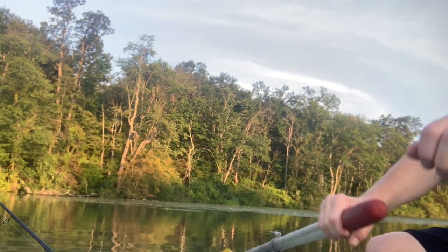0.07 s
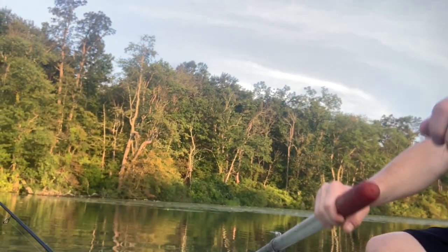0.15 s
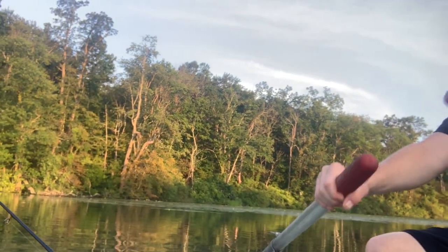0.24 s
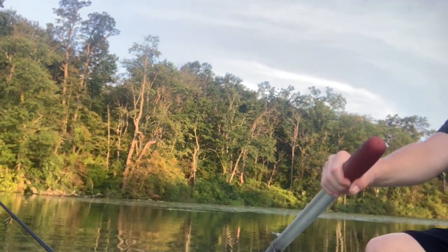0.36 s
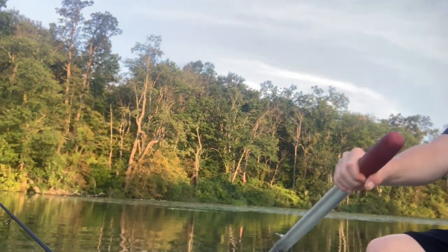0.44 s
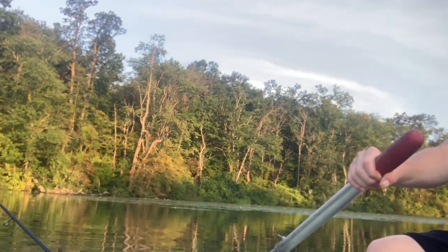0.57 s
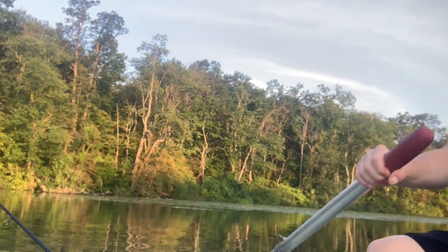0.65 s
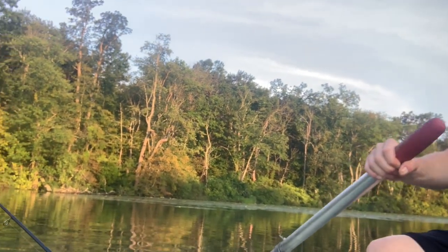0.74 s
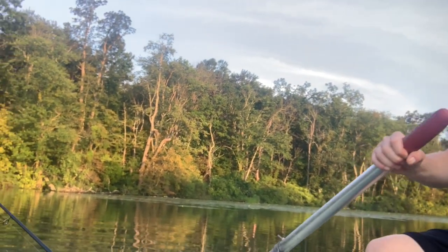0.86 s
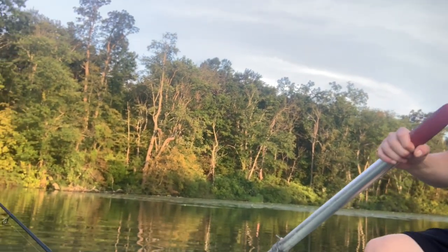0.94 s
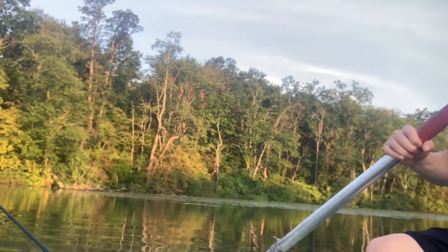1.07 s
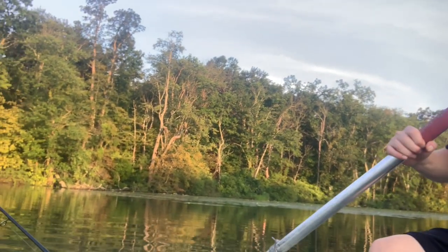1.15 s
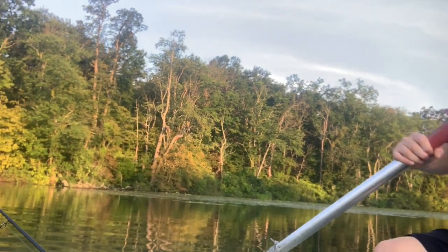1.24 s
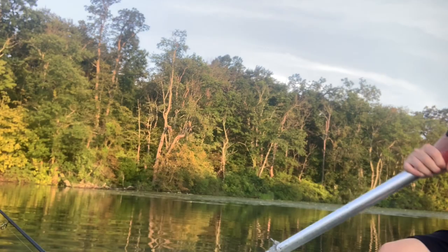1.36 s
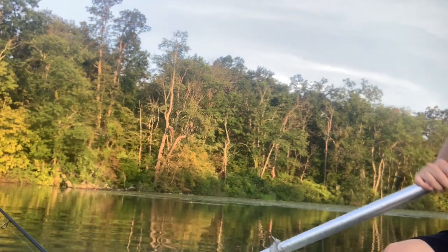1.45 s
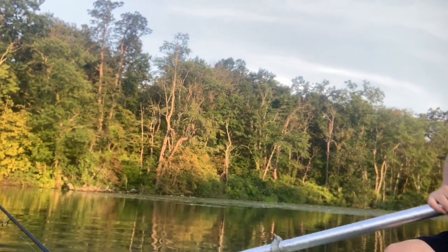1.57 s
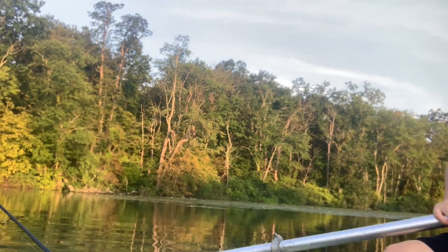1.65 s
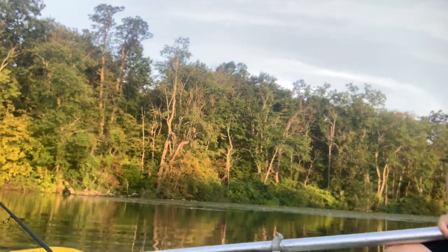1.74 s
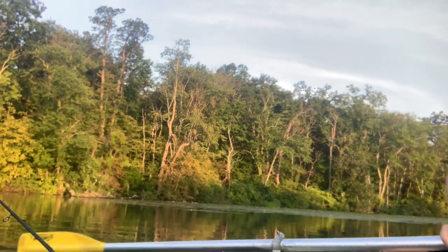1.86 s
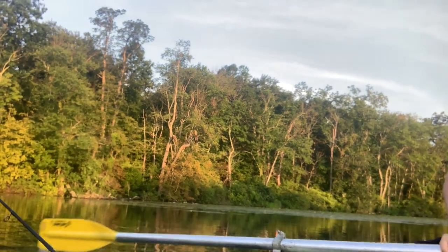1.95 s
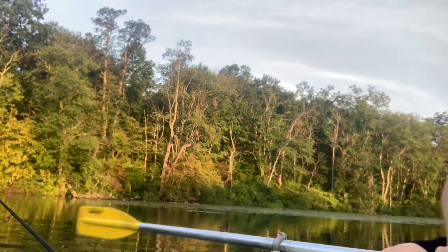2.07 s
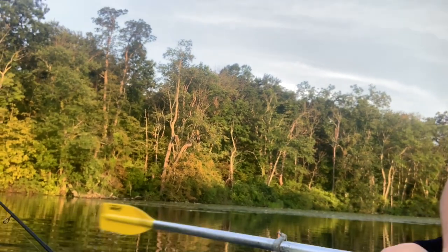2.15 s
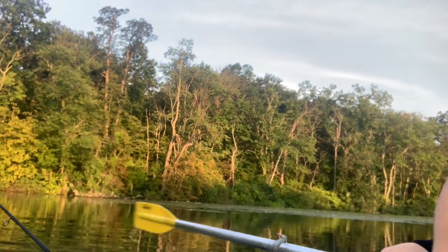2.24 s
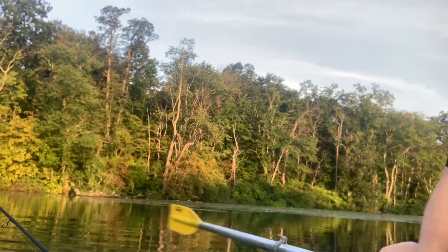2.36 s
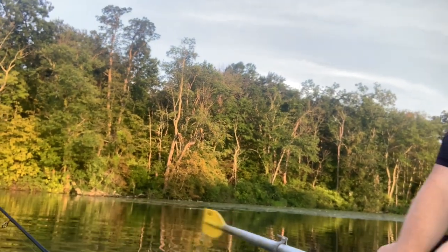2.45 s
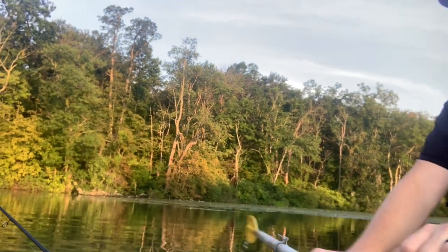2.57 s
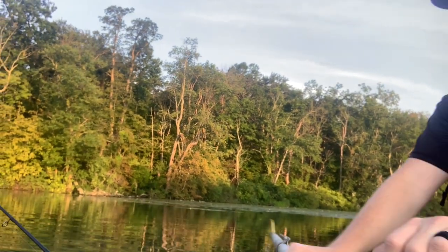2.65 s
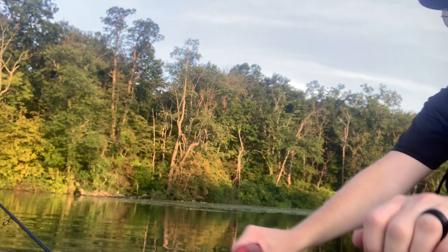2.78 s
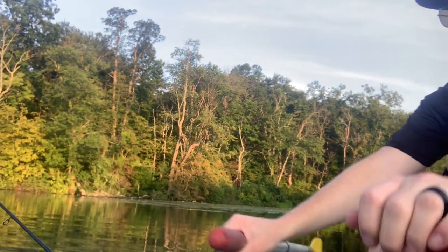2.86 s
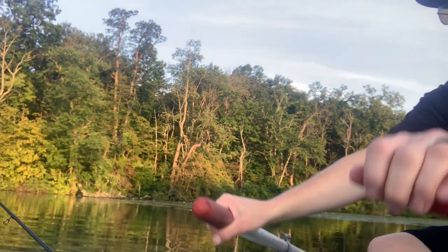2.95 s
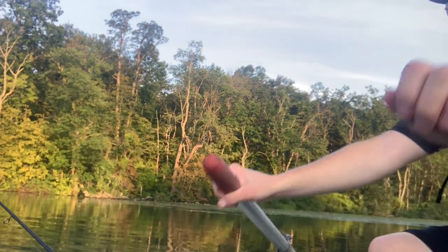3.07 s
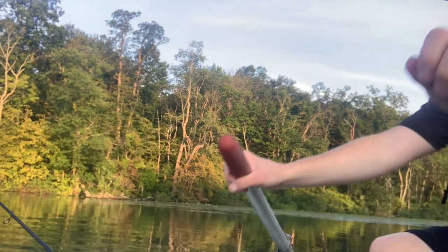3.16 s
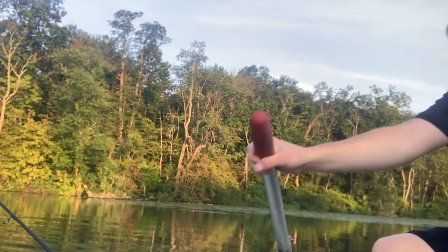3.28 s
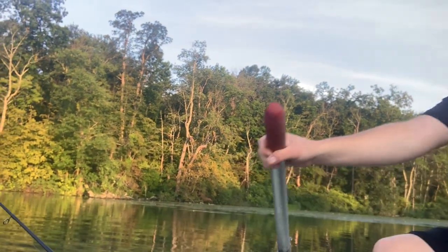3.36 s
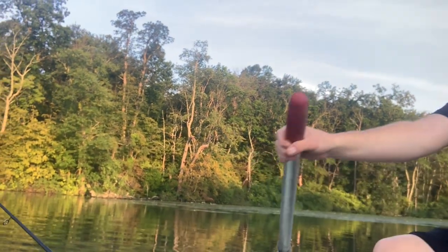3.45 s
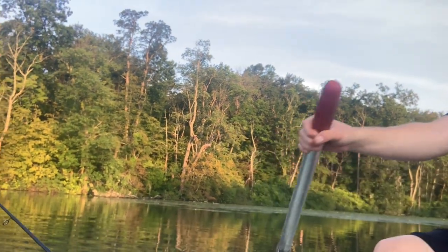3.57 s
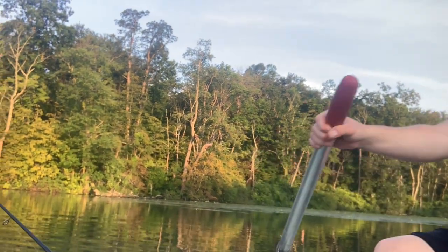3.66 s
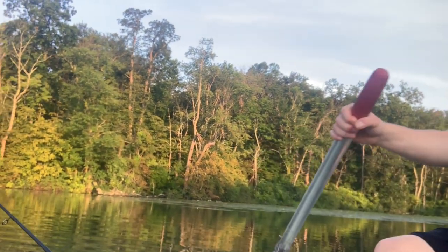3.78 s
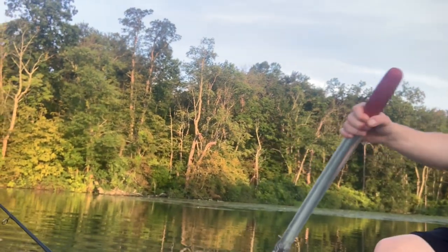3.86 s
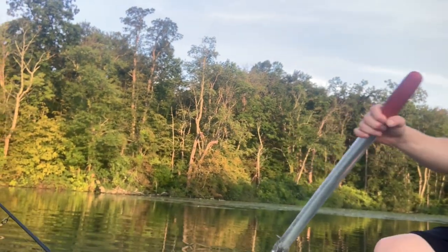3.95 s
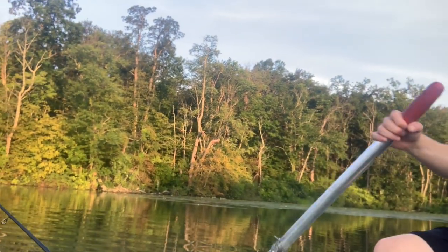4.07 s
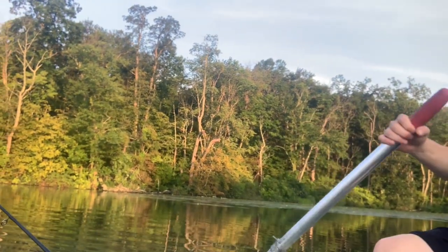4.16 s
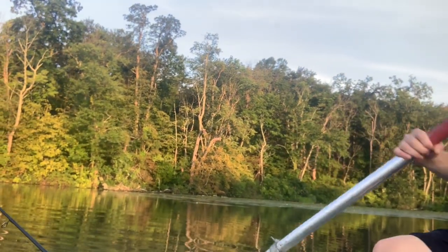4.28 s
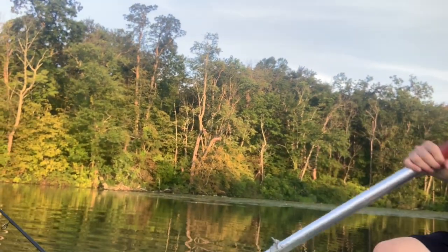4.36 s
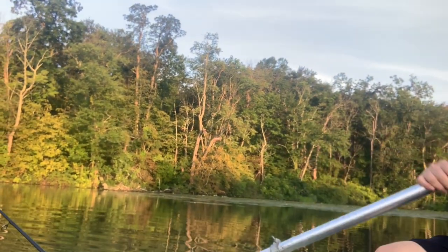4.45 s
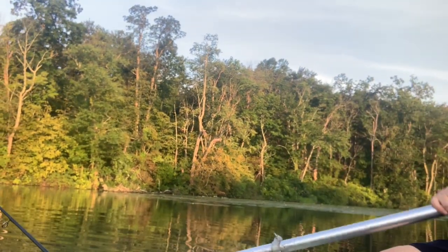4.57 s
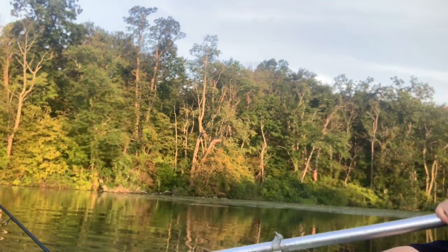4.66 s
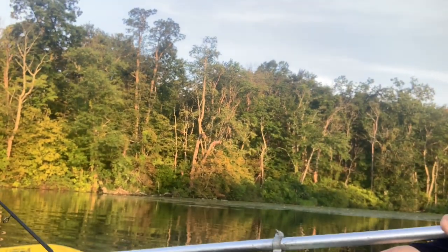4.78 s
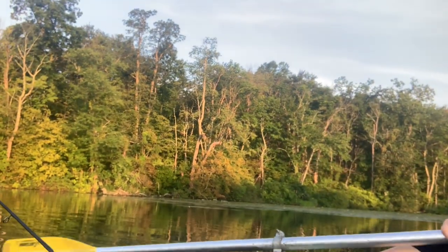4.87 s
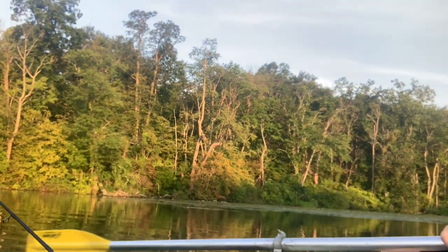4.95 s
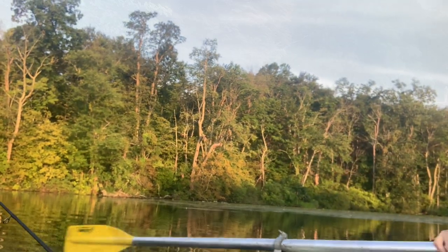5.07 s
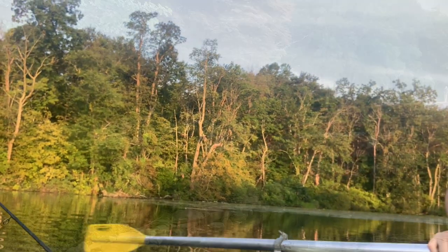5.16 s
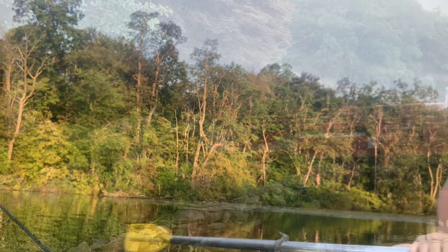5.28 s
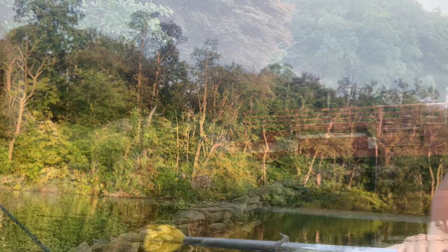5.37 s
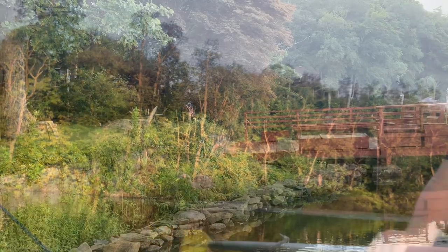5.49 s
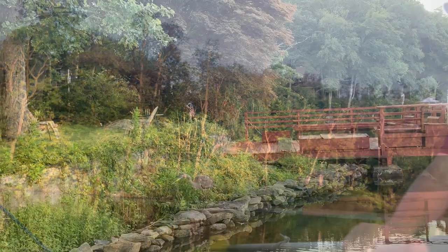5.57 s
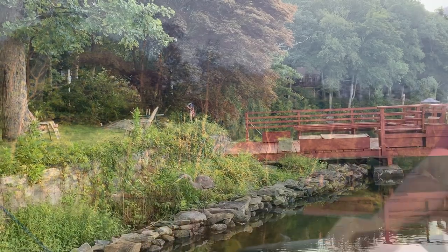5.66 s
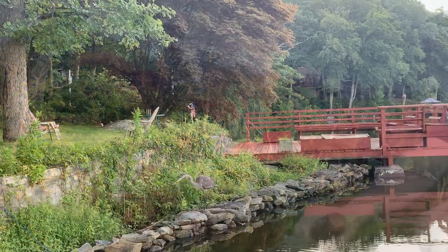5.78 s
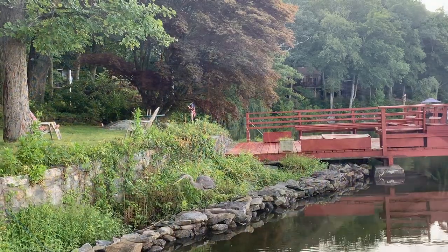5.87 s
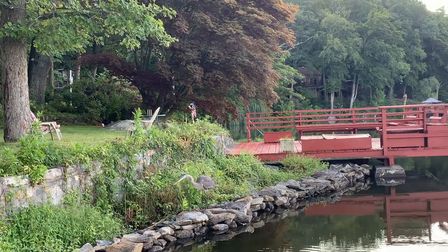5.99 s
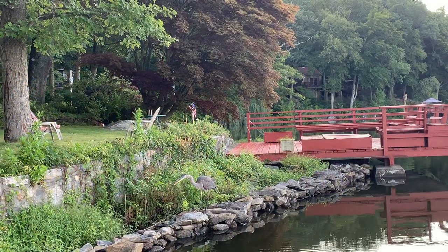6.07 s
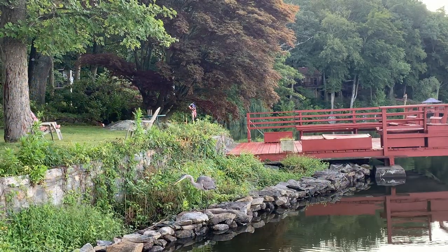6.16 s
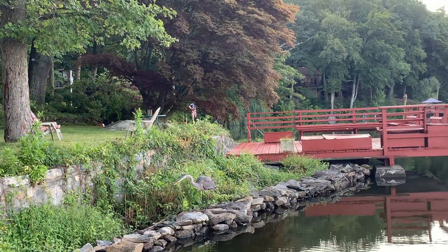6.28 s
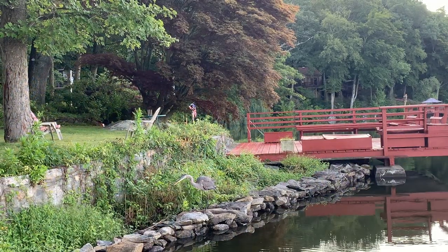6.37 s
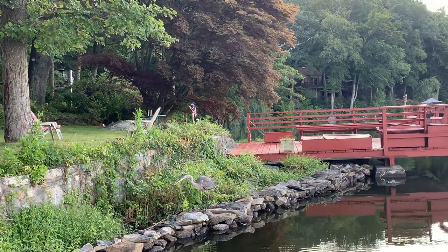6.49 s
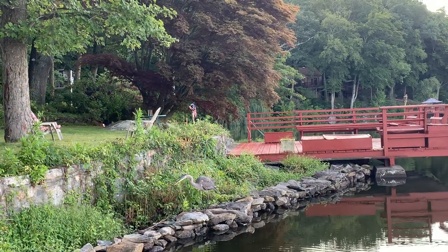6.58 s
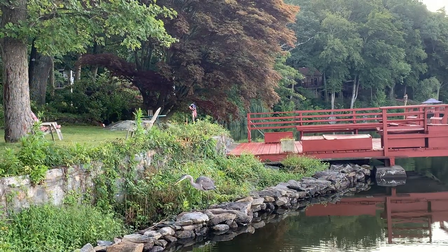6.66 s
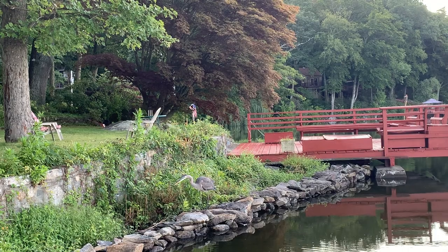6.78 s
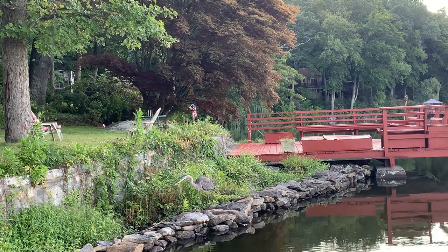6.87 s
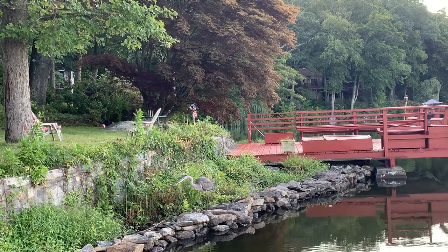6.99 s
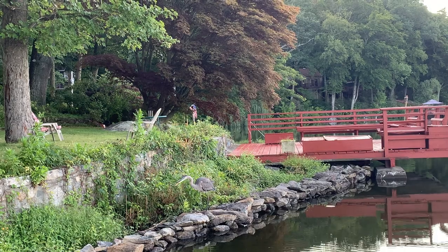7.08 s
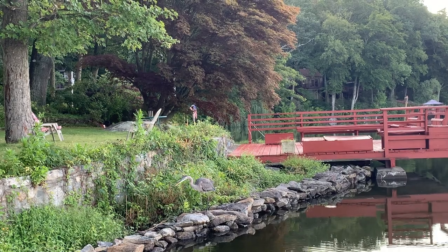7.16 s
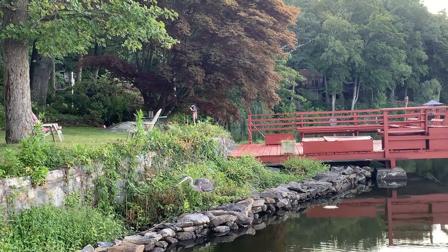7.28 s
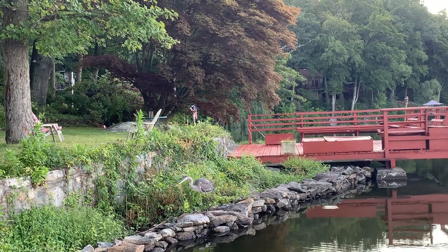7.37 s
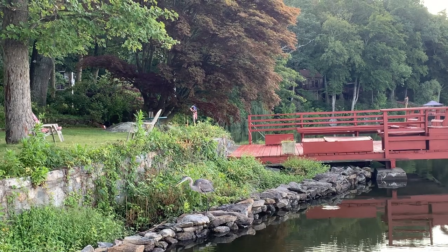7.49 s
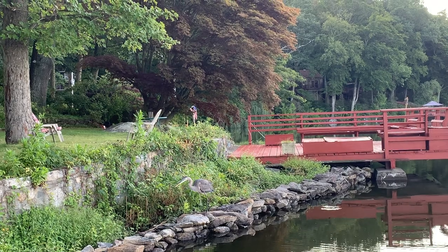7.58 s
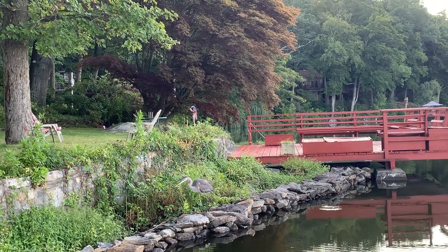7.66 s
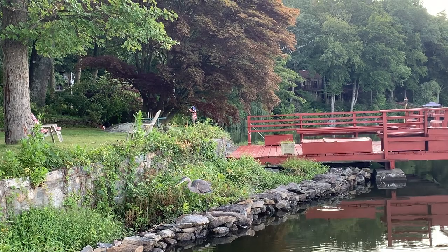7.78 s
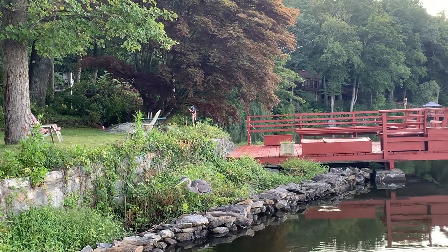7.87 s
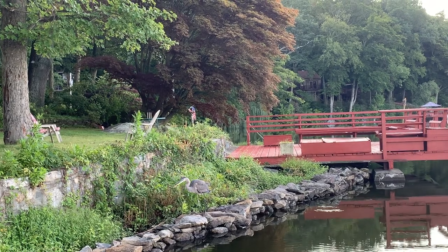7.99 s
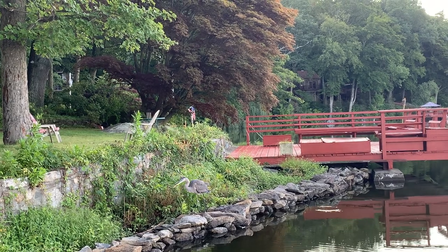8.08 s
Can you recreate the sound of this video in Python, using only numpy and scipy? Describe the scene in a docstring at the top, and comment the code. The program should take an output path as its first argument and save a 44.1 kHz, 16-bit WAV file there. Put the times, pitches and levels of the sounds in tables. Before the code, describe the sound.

Close stereo inside a small metal rowing boat on a lake, with low rumble and faint cicada hiss behind. A tiny clack at 0 s, then a very loud bright steel clank with hull thud at 0.3 s and a duller knock at 0.4. Quiet until 1.2-1.95 s, when the blade leaves the water: gurgling splash, fizz, distinct drips, soft thuds. Light hull bumps and creaks from 2.1 s; knocks around 2.65 and a short high ping at 2.97. From 3.1 s the loaded oar grinds and booms, with a strong low groan at 3.5 and weaker ones near 4; rattles at 4.1 and 4.45. A second splash and drips run 4.5-4.9, last bumps to 5.4. By 5.8 s it has dissolved to a quiet bank: thin birds whistle and chirp until about 7.5, over steady soft hiss, rumble and a far low motor, wavering and weakening to the end.

```python
"""Two oars work in the oarlocks of a small metal boat: struck steel modes and hull panels clank and thud.
Loaded, the oars grind, boom and groan as shaped noise and a sagging tone; the blades splash and drip as
crowds of damped bubble sines. Cicadas hiss in the woods as band noise over rumble and faint high hiss.
The scene then dissolves to a quiet bank: whistled songbirds, steady hiss and a far motor of two harmonics.
A small stereo microphone pair hears sources with differing leads and levels on its two sides."""
import sys
import numpy as np
from scipy import signal
from scipy.fft import rfft, irfft, next_fast_len
from scipy.io import wavfile
from scipy.ndimage import uniform_filter1d, map_coordinates

SR = 44100
rng = np.random.default_rng(int(sys.argv[2]) if len(sys.argv) > 2 else 0)


def store_pcm(level_fs):
    """Save levels as 16-bit WAV."""
    pcm = np.round(np.clip(level_fs, -1, 1) * 32767).astype(np.int16)
    wavfile.write(sys.argv[1], SR, np.atleast_2d(pcm).T)


N = 358532
T = np.arange(N) / SR


def amp(db):
    """Decibel law: level to amplitude."""
    return 10 ** (np.asarray(db) / 20)


def unit(x):
    """Normalisation: scale to rms 1."""
    return x / np.sqrt(np.mean(x ** 2) + 1e-20)


def along(points, hz):
    """Logarithmic frequency scale: interpolate (frequency [Hz], value) points."""
    f, v = np.transpose(points)
    return np.interp(np.log(hz + 1), np.log(f + 1), v)


def curves(rows):
    """Envelopes: interpolate each column over time; last comes a gate open over the rows' span."""
    s, *columns = np.transpose(rows)
    gate = np.clip(np.minimum(T - s[0], s[-1] - T) / .008, 0, 1)
    return [np.interp(T, s, column) for column in columns] + [gate]


def peak(s, db, rise_s, fall_db_s, depth_db=25, hold_s=0):
    """Exponential decay: a level climbs to db within rise_s after s, holds, then falls steadily in dB."""
    climb_db = depth_db * (1 - (T - s) / rise_s)
    fall_db = fall_db_s * np.maximum(T - s - rise_s - hold_s, 0)
    return db - np.maximum(climb_db, fall_db)


def wobble(rate):
    """Random modulation: a smooth curve with rate knots a second."""
    knots = rng.standard_normal(int(N * rate / SR) + 4)
    return map_coordinates(knots, [T * rate])


def filtered(x, response):
    """Linear filtering: the spectrum of x times a complex response of frequency."""
    m = 2 * next_fast_len(N // 2 + 4096)
    return irfft(rfft(x, m) * response(np.fft.rfftfreq(m, 1 / SR)), m)[..., :N]


def noise(spectrum, lo_hz=0, hi_hz=SR):
    """Spectral shaping: coloured noise of rms 1 between two soft edges."""
    def response(f):
        edges = 1 / (1 + (lo_hz / (f + 1)) ** 6) / (1 + (f / hi_hz) ** 6)
        return amp(along(spectrum, f)) * edges
    return unit(filtered(rng.standard_normal(N), response))


def resonance(f, centre_hz, width_hz):
    """Simple resonator: a band-pass response of gain 1 at its centre."""
    damping = 1j * f * width_hz
    return damping / (centre_hz * centre_hz - f * f + damping)


def heard(x, lead_ms, pan_db, turn=0):
    """Interaural cues: the left side leads by lead_ms and turn [rad], and is pan_db stronger."""
    half = lambda f: np.pi * f * lead_ms / 1000 + turn / 2
    sides = filtered(x, lambda f: np.exp(1j * np.array([half(f), -half(f)])))
    return sides * amp([[pan_db / 2], [-pan_db / 2]])


# left-right likeness of far sound: (frequency [Hz], correlation)
LIKENESS = [(60, 0.93), (200, 0.82), (350, 0.14), (550, 0.036), (1300, -0.65), (2400, -0.34), (3500, -0.34),
            (15000, 0.066)]
BASS_TURN, BASS_HZ = -.45, 450  # left lead [rad] in the bass; frequency [Hz] above which it fades


def far(spectrum):
    """Diffuse-field coherence: stereo noise of rms 1, nearly alike on both sides in the bass."""
    def mid_side(f):
        angle = np.arccos(np.clip(along(LIKENESS, f), -1, 1)) / 2
        return amp(along(spectrum, f)) * [np.cos(angle), np.sin(angle)]
    mid, side = filtered(rng.standard_normal((2, N)), mid_side)
    lead = lambda f: np.exp(.5j * np.outer([1, -1], BASS_TURN / (1 + (f / BASS_HZ) ** 4)))
    return filtered(np.array([mid + side, mid - side]), lead) / np.sqrt(np.var(mid) + np.var(side))


def patchy(x, depth_db):
    """Random time-frequency modulation: patches of gain over time and pitch."""
    z = signal.stft(x, nperseg=512)[2]
    field = uniform_filter1d(rng.standard_normal(z.shape[1:]), size=6, axis=0)
    field = uniform_filter1d(field, size=14, axis=1)
    return signal.istft(z * amp(depth_db * unit(field)), nperseg=512)[1][:, :N]


# far rumble on the lake: (frequency [Hz], relative density [dB])
LAKE_SPECTRUM = [(25, -16), (103, -4), (325, -13), (501, -23.5), (1360, -32), (3110, -37), (4500, -43.5),
                 (5850, -63.5), (9900, -120)]


def lake_rumble():
    """Diffuse field: far low noise whose level varies in patches."""
    return amp(-52) * patchy(far(LAKE_SPECTRUM), depth_db=4.5)


# faint high background hiss: (frequency [Hz], relative density [dB])
FINE_HISS_SPECTRUM = [(3000, -43.5), (6000, -2.5), (9000, -4), (12000, -8), (16000, -14.5)]
# its rise and fall: (time [s], level [dB])
FINE_HISS_LEVEL = [(0.0, -84), (0.36, -69.5), (0.9, -79.5), (1.2, -69.5), (1.38, -62.5), (2.7, -67.5),
                   (2.9, -71.5), (3.27, -62.5), (3.7, -73.5), (4.68, -70.5), (5.27, -67.5), (5.7, -72)]


def fine_hiss():
    """Amplitude modulation: a faint high background hiss, rising and falling in level."""
    level_db, _ = curves(FINE_HISS_LEVEL)
    return heard(amp(level_db) * noise(FINE_HISS_SPECTRUM), 0.25, .3, turn=0.98)


# cicada chorus: (frequency [Hz], relative density [dB])
CICADA_SPECTRUM = [(4200, -6), (4900, 1.5), (5700, 8.5), (6500, 4), (7200, -20), (9000, -54)]


def cicadas():
    """Incoherent superposition: the chorus is unrelated band noise on each side, with a shared flutter."""
    sides = np.array([noise(CICADA_SPECTRUM), noise(CICADA_SPECTRUM)])
    return amp(0.69 * wobble(60)) * sides * amp([[-58], [-61]])


# far rumble and faint noise at the bank: (frequency [Hz], relative density [dB])
BANK_SPECTRUM = [(15, -66), (43, -6.5), (113, -2.5), (190, -15), (662, -28), (3290, -39), (4370, -38.5),
                 (7000, -58), (9100, -48), (15400, -120)]


def bank_rumble():
    """Diffuse field: far rumble and faint noise, gently patchy in level."""
    return amp(-47) * patchy(far(BANK_SPECTRUM), depth_db=2.5)


# steady faint high background hiss: (frequency [Hz], relative density [dB])
HISS_AT_BANK = [(4000, -76), (6500, 3.5), (9000, 0.5), (12000, -2.5), (15200, -1.5), (16000, -25.5)]


def bank_hiss():
    """Stationary noise: a steady faint high background hiss above the rumble."""
    return heard(amp(-72.5) * noise(HISS_AT_BANK), -.227, .2, turn=1.03)


# far engine: (time [s], level before swell [dB])
MOTOR_LEVEL = [(5.6, -64.5), (5.93, -43), (6.72, -44), (7.18, -50), (8.13, -50)]
# its harmonics: (multiple of the fundamental, relative level [dB])
MOTOR_ORDERS = [(1, 0), (2, -15)]
MOTOR_HZ = 113


def motor():
    """Harmonic series: a far engine drones; the air makes it swell and fade."""
    db, on = curves(MOTOR_LEVEL)
    swell_db = 4
    turn = 2 * np.pi * MOTOR_HZ * T + .5 * wobble(8.7)
    drone = sum(amp(level + swell_db * wobble(9.0)) * np.sin(k * turn) for k, level in MOTOR_ORDERS)
    return heard(on * amp(db) * drone, 0, .2, turn=BASS_TURN)


# near bird's first note: (time [s], pitch [Hz], level [dB])
NEAR_BIRD = [(5.596, 3190, -51), (5.631, 3334, -59.5), (5.774, 3180, -59.5), (5.81, 3250, -81)]
# far bird notes: (start [s], length [s], start pitch [Hz], end pitch [Hz], start level [dB])
FAR_BIRDS = [(5.851, .04, 3400, 2710, -71.5), (6.77, .05, 3000, 2530, -65.5),
             (5.994, 0.1, 2740, 2860, -67.5), (6.109, 0.18, 3260, 3100, -66),
             (6.284, 0.055, 3430, 2750, -61), (6.386, 0.053, 3880, 3580, -64.5),
             (6.39, 0.068, 4420, 4040, -64.5), (6.479, 0.23, 3590, 3450, -71),
             (6.55, 0.042, 4540, 4800, -60), (6.595, 0.048, 4800, 4300, -66.5),
             (6.668, 0.077, 4040, 3340, -58.5), (6.709, 0.059, 3460, 3240, -57),
             (6.86, 0.054, 3650, 3650, -59), (6.909, 0.065, 3590, 3920, -65.5),
             (7.01, 0.056, 3540, 3120, -58), (7.062, 0.058, 3780, 2720, -59),
             (7.196, 0.14, 3000, 3030, -67), (7.443, 0.05, 4770, 3890, -62)]
NOTE_FADE_DB = 1.5  # from start to end of a far note


def birds():
    """Frequency modulation and reverberation: unsteady far whistles and a near note, smeared by the trees."""
    waver = 1 + 0.014 * wobble(90)
    flutter = .8 + 0.7 * wobble(260)  # leaves break up the far notes
    hz, db, on = curves(NEAR_BIRD)
    turn = 2 * np.pi * np.cumsum(hz) / SR
    # the near note shows the partials around its strongest
    partials = .2 * np.sin(3 / 2 * turn) + .1 * np.sin(3 / 4 * turn) + .07 * np.sin(5 / 4 * turn)
    out = on * amp(db) * (np.sin(turn) + partials)
    for s, long, start_hz, end_hz, start_db in FAR_BIRDS:
        hz, db, on = curves([(s, start_hz, start_db), (s + long, end_hz, start_db - NOTE_FADE_DB)])
        out += on * amp(db) * flutter * np.sin(2 * np.pi * np.cumsum(hz * waver) / SR)
    t = T[:SR // 2]
    tail = rng.standard_normal((2, len(t))) * amp(-60 * t / 0.5)
    smeared = signal.fftconvolve(out[None], tail / np.linalg.norm(tail[0]), axes=1)[:, :N]
    return heard(out, -0.31, 0.58) + amp(-1.0) * smeared


def bubbles(s, db, hz, cycles, rise=.11):
    """Bubble resonance: damped sines whose pitch rises as each bubble nears the surface."""
    t = np.arange(700) / SR
    u = t * (hz / cycles)[:, None]
    envelope = amp(db)[:, None] * np.exp(-2.5 * u) * (1 - np.exp(-12 * u))
    x = envelope * np.sin(2 * np.pi * hz[:, None] * t * (1 + rise * u))
    x *= np.cos(np.linspace(0, np.pi / 2, len(t)))  # close each bubble smoothly
    at = np.round(s * SR).astype(int)[:, None] + np.arange(len(t))
    return np.bincount(at.ravel(), x.ravel(), N + SR)[:N]


# bubble strength by pitch, also the colour of fizz and spray: (frequency [Hz], relative level [dB])
BUBBLE_SPECTRUM = [(300, 19), (700, -6), (1500, -6), (3000, -3), (5000, 7), (8500, -8), (9500, -130),
                   (16000, -37.5)]


def crowd(lo_hz, hi_hz, count, cycles=5, longer=18):
    """Random superposition: bubbles of chance pitch, size and life while the oars work; rms 1."""
    draw = rng.random((count, 4))
    hz = lo_hz * (hi_hz / lo_hz) ** draw[:, 1]
    db = along(BUBBLE_SPECTRUM, hz) - 3 * np.log(draw[:, 2] + .01)
    return unit(bubbles(5.2 * draw[:, 0], db, hz, cycles + longer * draw[:, 3] ** 2))


# single bubbles and drops: (time [s], level [dB], pitch [Hz])
SINGLE_DROPS = [(0.136, -57, 2710), (0.202, -56, 1730), (1.335, -42.5, 2870), (1.401, -29, 3680),
                (1.4258, -33.5, 2050), (1.493, -36, 4560), (1.5586, -43, 1540), (1.581, -42, 1690),
                (1.609, -39, 2400), (1.681, -38, 2300), (1.762, -45, 980), (1.772, -36.5, 1960),
                (1.779, -36, 1310), (1.861, -41.5, 940), (1.924, -43, 1290), (4.535, -37, 3320),
                (4.617, -28, 3900), (4.633, -29, 4000), (4.583, -44, 1890), (4.627, -38, 1750),
                (4.6516, -34, 2070), (4.743, -41, 1020), (4.759, -34, 830), (4.7714, -30.5, 1083),
                (4.795, -34.5, 1000), (4.865, -42, 1470), (4.892, -36, 3660)]
# a short steady ping and its partials: (time [s], level [dB], pitch [Hz])
PING_PARTIALS = [(2.969, -33.5, 2270), (2.969, -43, 4240), (2.969, -46, 4400), (2.969, -41, 10000)]


def drops():
    """Bubble resonance: loud single bubbles, each with two weaker neighbours near in time and pitch; one ping."""
    s, db, hz = np.transpose(SINGLE_DROPS)
    out = bubbles(s, db, hz, np.clip(36000 / hz, 7, 18))
    out += bubbles(*np.transpose(PING_PARTIALS), np.full(len(PING_PARTIALS), 30.), rise=0)
    for _ in range(2):
        late, off = rng.standard_normal((2, len(s)))
        out += bubbles(s + .008 * late, db - 8, hz * np.exp(.13 * off), np.full(len(s), 9.))
    return heard(out, 0.113, 5.9)


# water eddies round the blade: (time [s], level before wobble [dB])
EDDIES = [(.2, -80), (.27, -54.5), (.32, -89.5), (3.18, -85), (3.28, -56.5), (3.5, -57), (3.75, -57),
          (3.84, -81), (3.87, -57.5), (4.1, -54), (4.2, -72)]
# blade leaves the water: (start [s], end [s], flow level [dB])
BLADE_EXITS = [(1.172, 1.954, -58.5), (4.474, 4.915, -57.5)]
SPLASH_RISE_S, SPLASH_FALL_S, SPLASH_SWELL_DB = 0.38, 0.26, 12.5
WATER_DB, SPRAY_DB = -0.5, -4.5  # against the flow level


def splash():
    """Bubble entrainment: water pours off the blade in clumps as gurgles, small bubbles, fizz and ticking spray."""
    clumps = amp(3.6 * wobble(60))
    gurgle = amp(3.5 * wobble(30) + 3) * crowd(650, 2620, count=2400)
    fizz = .35 * noise(BUBBLE_SPECTRUM, lo_hz=1500)
    water = clumps * (crowd(1520, 9460, count=2600) + fizz)
    ticks = crowd(4000, 8800, count=400, cycles=2.6, longer=0)
    spray = noise(BUBBLE_SPECTRUM, lo_hz=6810) + ticks
    swirl_db, pulling = curves(EDDIES)
    out = pulling * amp(swirl_db + 3 * wobble(17)) * crowd(600, 1800, count=2600)
    for start, end, db in BLADE_EXITS:
        low_db = db - SPLASH_SWELL_DB
        flow_db, on = curves([(start, low_db), (start + SPLASH_RISE_S, db),
                              (end - SPLASH_FALL_S, db), (end, low_db)])
        out += on * amp(flow_db) * (gurgle + amp(WATER_DB) * water + amp(SPRAY_DB) * spray)
    return out


# the oar shaft's resonances: (centre [Hz], width [Hz], level over what excites it [dB])
SHAFT_MODES = [(920, 13, 0), (1343, 180, -1.5), (2360, 600, -0.5)]


def sings(f):
    """Forced resonance: the shaft's modes on top of what excites them."""
    return 1 + sum(amp(db) * resonance(f, centre, width) for centre, width, db in SHAFT_MODES)


# hull panels: (frequency [Hz], 60 dB decay time [s])
HULL_MODES = [(70, 0.97), (105, 0.15), (170, 0.17), (185, 0.34), (220, 0.15), (250, 0.018), (290, 0.17),
              (335, 0.17), (425, 0.095), (500, 0.13), (545, 0.2), (615, 0.064), (720, .07)]
HUM_DB = 5  # how far each panel stands out of the grinding


def hums(f):
    """Forced resonance: the hull panels' modes, of width set by their decay time, on top of what excites them."""
    width = lambda t60: np.log(1000) / np.pi / t60
    return 1 + amp(HUM_DB) * sum(resonance(f, centre, width(t60)) for centre, t60 in HULL_MODES)


# hull under load: (frequency [Hz], relative density [dB])
LOADED_HULL = [(25, -42.5), (65, -4.5), (121, 0.5), (220, -3), (600, -14), (830, -30), (1650, -41.5),
               (4380, -49), (6500, -78.5), (11000, -120)]
# steady oar load on the hull: (time [s], level [dB])
OAR_LOAD = [(0.0, -56), (1.06, -62), (1.4, -42), (1.68, -39), (1.8, -56), (2.05, -57), (2.24, -43.5),
            (2.32, -53.5), (2.62, -60.5), (3.2, -48), (3.46, -39), (3.8, -38.5), (4.11, -36), (4.33, -46),
            (4.5, -38.5), (4.68, -36.5), (4.8, -45.5), (5.08, -42), (5.15, -52), (5.7, -101)]
PIVOT_DB, BODY_OVER_DB, RUB_OVER_DB = -39.5, -2, -25.5  # at this load, body and rub against the boom
BODY_GROWS, RUB_GROWS = 1.4, 1.3  # dB per dB of load
PULL_START_S, PULL_END_S, PULL_RUB_DB = 2.3, 5.5, 6.5  # blade pulls in the water, shaft grinds harder
# the oar lurches in its lock and the hull shudders: (onset [s], boom level [dB], body level [dB])
LURCHES = [(0.331, -44.5, -27.5), (.44, -22.5, -28), (1.855, -40, -46), (2.65, -36.5, -36.5),
           (2.895, -42.5, -44.5), (3.1, -37.5, -37), (3.27, -56.5, -34), (3.512, -31, -33),
           (4.879, -36, -42.5), (5.22, -33, -50), (5.388, -39.5, -37)]
JOLT_RISE_S, JOLT_HOLD_S = 0.012, 0.025
BOOM_FALL_DB_S, BODY_FALL_DB_S = 85, 124.5
# oarlock pin slipping: (full strength [s], level [dB], fall [dB/s])
PIN_SLIPS = [(3.53, -11.5, 255), (3.941, -26.5, 158), (4.074, -29, 164)]
GROAN_HZ, GROAN_SAG_HZ_S = 220.7, 13
GROAN_RISE_S, GROAN_HOLD_S, GROAN_LASTS_S = 0.085, 0.018, 0.23


def strain():
    """Stick-slip friction: the loaded oar grinds in its lock; the panels boom, the pin slips at a hull mode."""
    load_db, gate = curves(OAR_LOAD)
    over_db = load_db - PIVOT_DB
    jolt = lambda s, db, fall: amp(peak(s, db, JOLT_RISE_S, fall, hold_s=JOLT_HOLD_S))
    boom = amp(load_db) + sum(jolt(s, db, BOOM_FALL_DB_S) for s, db, _ in LURCHES)
    shudder = sum(jolt(s, db, BODY_FALL_DB_S) for s, _, db in LURCHES)
    body = amp(PIVOT_DB + BODY_OVER_DB + BODY_GROWS * over_db) + shudder
    pull = np.clip(np.minimum(T - PULL_START_S, PULL_END_S - T) / 0.038, 0, 1)
    rub = amp(PIVOT_DB + RUB_OVER_DB + RUB_GROWS * over_db + PULL_RUB_DB * pull) + amp(-26.5) * shudder
    jerk = wobble(35)  # body and rub jerk together
    panel_noise = unit(filtered(noise(LOADED_HULL, lo_hz=160, hi_hz=720), hums))
    shaft_noise = filtered(noise(LOADED_HULL, lo_hz=680), sings)
    out = boom * amp(1.5 * wobble(13.0)) * noise(LOADED_HULL, hi_hz=142)
    out += body * amp(3.17 * jerk) * panel_noise
    out += rub * amp(3.1 * jerk + 1.7 * wobble(7.0)) * shaft_noise
    for s, db, fall_db_s in PIN_SLIPS:
        turn = 2 * np.pi * np.cumsum(GROAN_HZ - GROAN_SAG_HZ_S * np.clip(T - s, -1, 1)) / SR
        on = np.clip((s + GROAN_LASTS_S - T) / .02, 0, 1)
        groan_db = peak(s - GROAN_RISE_S, db, GROAN_RISE_S, fall_db_s, depth_db=42, hold_s=GROAN_HOLD_S)
        out += on * amp(groan_db) * np.sin(turn)
    return gate * out


def ring(hz, db, t60, t):
    """Modal superposition: decaying modes at chance strengths and phases, peak 1."""
    chance = rng.standard_normal((2, len(hz), 1))
    spread_db = 3.2
    modes = amp(db + spread_db * chance[0] - 60 * t / t60) * np.sin(2 * np.pi * hz * t + chance[1])
    x = np.sum(modes, axis=0)
    return x / np.max(np.abs(x))


# oarlock and oar shaft: (frequency [Hz], relative level [dB], 60 dB decay time [s])
STEEL_MODES = [(1198, -3.5, 0.057), (1450, 0, 0.12), (1800, 4, .1), (2260, 4, 0.06), (2950, 9, 0.092),
               (3300, 3.5, .08), (4160, 8.5, .07), (4380, 5, .055)]
# oar against oarlock: (time [s], blow level [dB], hull thud level [dB], thud centre [Hz], treble level [dB])
CONTACTS = [(0.0275, -31.5, -34.5, 318, -63), (0.3209, -1, -12, 314, -15), (0.343, -32, -21, 480, -60),
            (0.4068, -15, -15, 300, -54), (0.4333, -15, -7, 470, -38.5), (0.7364, -47.5, -22.5, 230, -79),
            (1.4007, -43, -26, 178, -47.5), (1.6364, -48, -21.5, 224, -50.5), (1.8538, -50, -23, 212, -64),
            (1.924, -68, -32, 103, -43), (2.108, -53.5, -34, 105, -54), (2.181, -53, -31, 127, -55),
            (2.428, -58.5, -40, 177, -66.5), (2.6475, -32, -22.5, 550, -75),
            (2.665, -60, -17, 172, -77),(2.8981, -72, -26, 127, -69), (3.098, -40.5, -17.5, 293, -52),
            (3.129, -29.5, -64, 200, -37.5), (3.2397, -67, -27.5, 540, -75), (3.2681, -65, -15, 215, -79),
            (3.515, -62, -15.5, 212, -62), (3.859, -71, -31.5, 400, -66), (3.8849, -60, -22, 125, -57.5),
            (4.0659, -35.5, -20.5, 221, -41.5), (4.125, -30, -24.5, 500, -28), (4.144, -34, -45, 400, -57),
            (4.234, -36, -38, 105, -41), (4.379, -45, -51, 167, -46), (4.456, -26.5, -21, 394, -23),
            (5.0019, -55, -29, 179, -66.5), (5.3379, -53, -24.5, 206, -67), (5.3878, -34, -19, 450, -42.5)]
KNOCK_FROM_BLOW, KNOCK_FROM_THUD, KNOCK_DB = 0.53, 0.36, -17.5  # the mid knock grows with both, dB per dB
EDGE_FOLLOWS = .45  # the upper rattle takes on this share of a blow's dullness
HARD_TILT_DB, SOFT_DULLS = 6, 0.6  # steel treble per octave at 0 dB; lost per octave and dB of softer blow


def clanks():
    """Impact excitation: contacts rattle the steel, whose treble dies first, and thud the hull at the same moment."""
    t = np.arange(SR // 3) / SR
    flat = [(500, 0.5), (6000, 3.5), (16000, -16.0)]  # (frequency [Hz], relative density [dB])
    ragged = amp(1.4 * wobble(90))  # the loose pin chatters
    body = unit(filtered(noise(flat, 390, 1900), sings))
    edge = unit(filtered(noise(flat, 1600, 3100), sings))
    upper, top = noise(flat, 2100, 4400), noise(flat, lo_hz=4520)
    fall = lambda fast, slow, slow_db: amp(-60 * t / fast) + amp(slow_db - 60 * t / slow)
    body_fall, edge_fall, top_fall = fall(0.065, 0.25, -2.0), fall(0.058, 0.15, -10.5), fall(0.034, 0.13, -15)
    steel_hz, steel_db, steel_t60 = np.transpose(STEEL_MODES)[:, :, None]
    panel_hz, panel_t60 = np.transpose(HULL_MODES)[:, :, None]
    out = np.zeros(N)
    for s, db, thud_db, centre_hz, top_db in CONTACTS:
        knock_db = KNOCK_FROM_BLOW * db + KNOCK_FROM_THUD * thud_db + KNOCK_DB
        upper_db = db + EDGE_FOLLOWS * (top_db - db)
        at = slice(round(s * SR), round(s * SR) + len(t))
        rattle = amp(knock_db) * body[at] * body_fall
        rattle += (amp(db - 9.0) * edge[at] + amp(upper_db - 6.5) * upper[at]) * edge_fall
        rattle += amp(top_db) * top[at] * top_fall
        tilt_db = (HARD_TILT_DB + SOFT_DULLS * upper_db) * np.log2(steel_hz / steel_hz[0])
        steel = amp(db - 3.0) * ring(steel_hz, steel_db + tilt_db, steel_t60, t)
        near_db = -13 * np.abs(np.log2(panel_hz / centre_hz))  # panels near the blow's centre speak most
        thud = amp(thud_db) * ring(panel_hz, near_db, panel_t60, t) * (1 - np.exp(-t / 0.0023))
        out[at] += (ragged[at] * rattle + steel) * (1 - np.exp(-t / 0.003)) + thud
    return out


# sound in the boat: (frequency [Hz], left lead [rad])
BOAT_LEAD = [(60, -.45), (350, -.45), (700, .6), (1400, 1.4), (2400, 2.8), (3100, 4.7), (5000, 9.4),
             (9200, 15.7), (16000, 25.9)]
# share off the hull walls: (frequency [Hz], mixing angle [rad])
WALL_SHARE = [(150, .08), (260, .15), (500, .45), (1000, .5), (5000, .7), (8000, .25), (12000, .1)]
BASS_LEFT_DB, BASS_LEFT_HZ = 2.5, 130  # the hull's lowest notes reach the left side stronger


def aboard(source, pan_db):
    """Direct and scattered sound: a path leading on the left; hull walls add an unrelated part to each side."""
    def paths(f):
        lead = np.interp(f, *np.transpose(BOAT_LEAD))
        left_db = BASS_LEFT_DB / 2 / (1 + (f / BASS_LEFT_HZ) ** 4)
        return np.exp(.5j * np.array([lead, -lead])) * amp([left_db, -left_db])
    mix = lambda f: np.clip(along(WALL_SHARE, f), 0, np.pi / 4)
    unrelated = np.array([source(), source()])
    direct, walls = filtered(unrelated, lambda f: [np.cos(mix(f)), np.sin(mix(f))])
    sides = np.array([direct + walls, direct - walls])
    return filtered(sides, paths) * amp([[pan_db / 2], [-pan_db / 2]])


def scene():
    """Superposition and equal-power fading: the lake gives way to the bank around the boat, birds and motor."""
    cross = lambda start, end: np.clip((T - start) / (end - start), 0, 1) * np.pi / 2
    lake = lake_rumble() + fine_hiss() + cicadas()
    bank = bank_rumble() + bank_hiss()
    ambience = np.cos(cross(5.3, 5.79)) * lake + np.sin(cross(5.55, 5.81)) * bank
    boat = drops() + aboard(splash, 3.4) + aboard(strain, .6) + aboard(clanks, 0.33)
    return ambience + motor() + birds() + boat


def record(dry):
    """Band limiting: nothing is kept from 15.9 kHz upward."""
    return filtered(dry, lambda hz: hz < 15900)


dry = scene()
out = record(dry)
store_pcm(out)
```